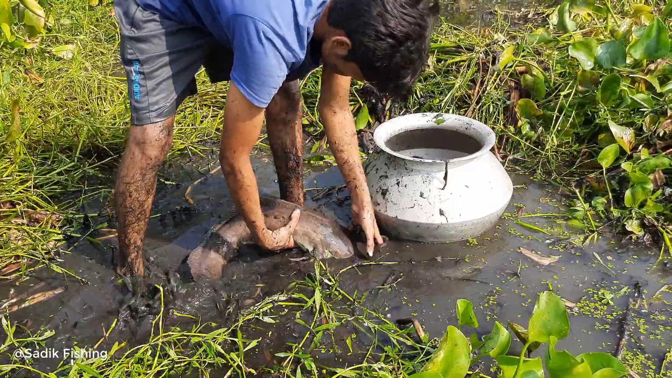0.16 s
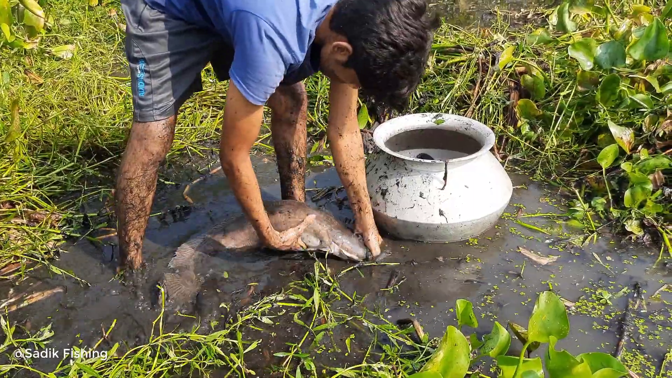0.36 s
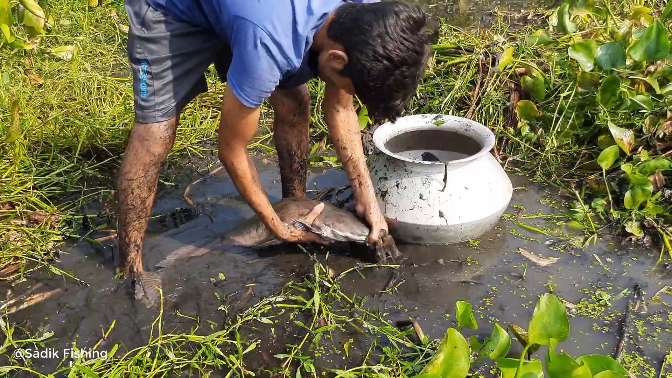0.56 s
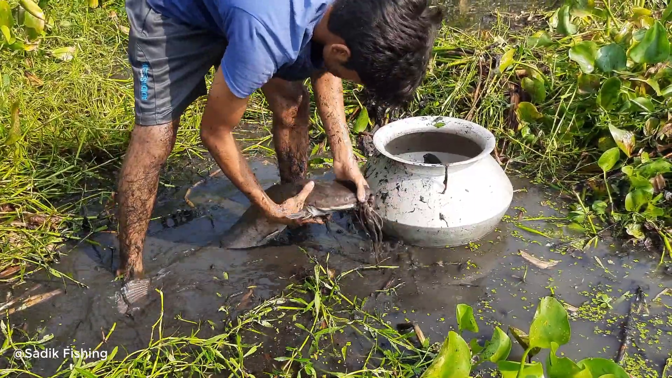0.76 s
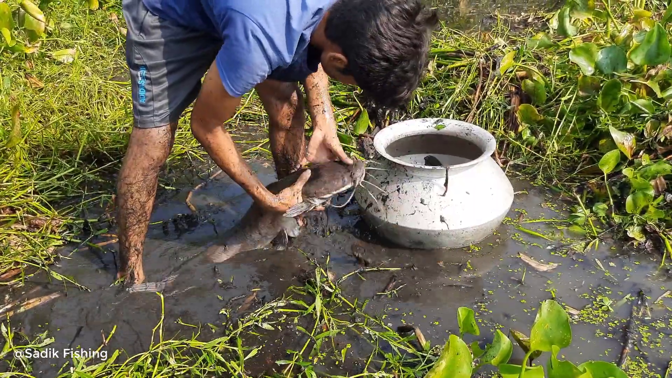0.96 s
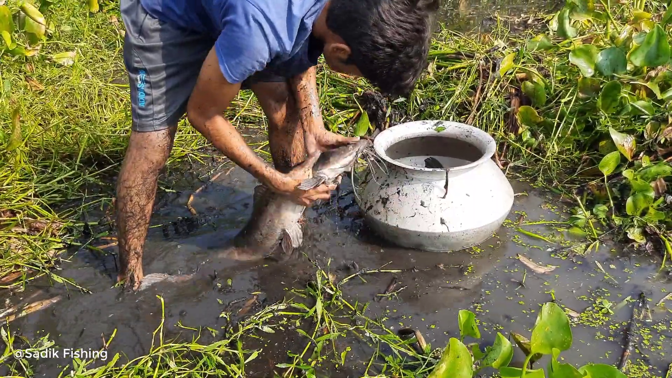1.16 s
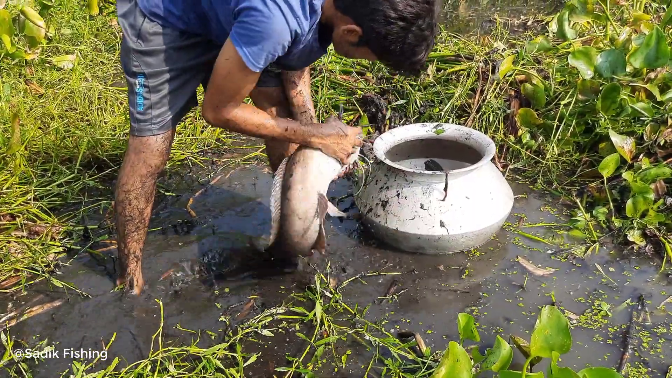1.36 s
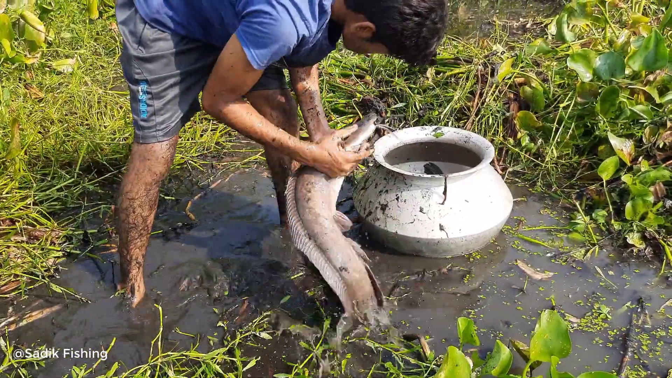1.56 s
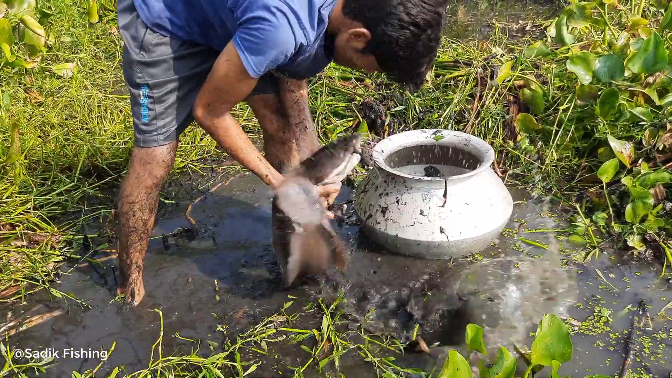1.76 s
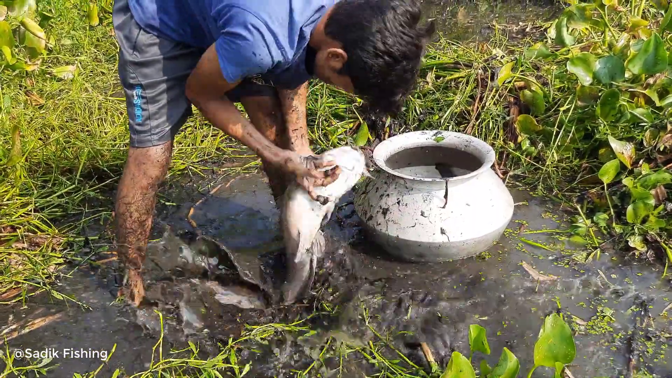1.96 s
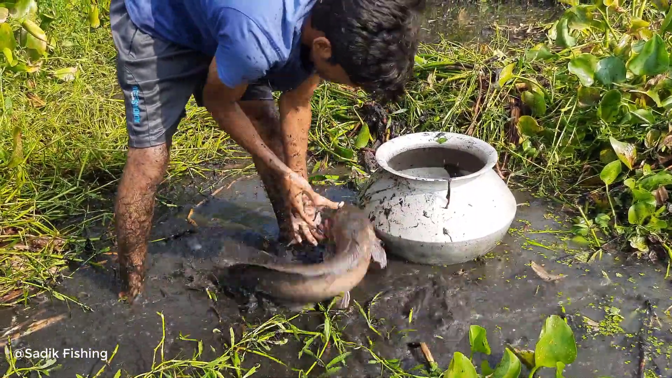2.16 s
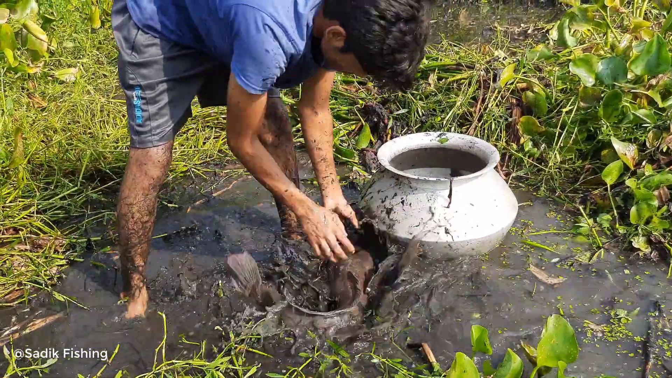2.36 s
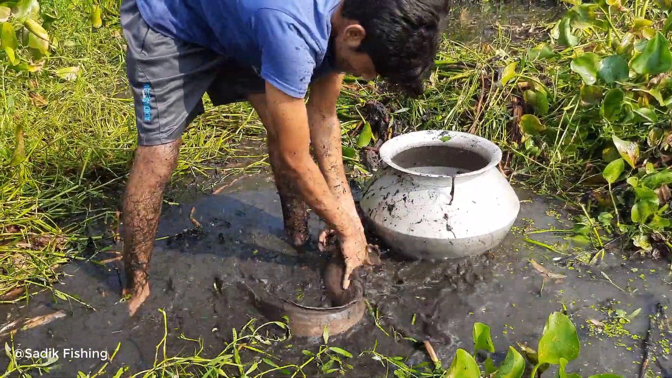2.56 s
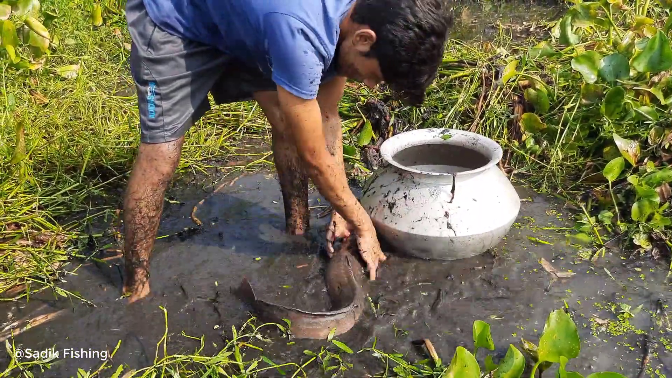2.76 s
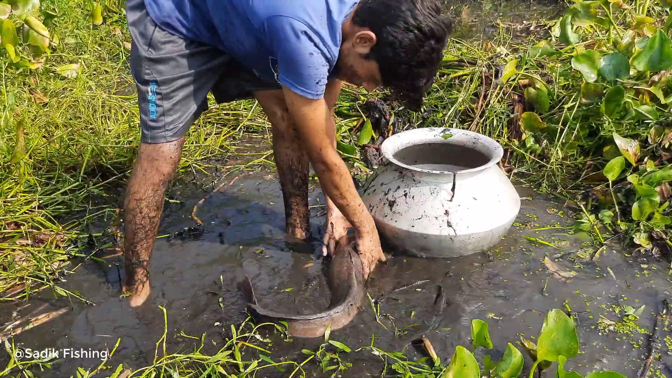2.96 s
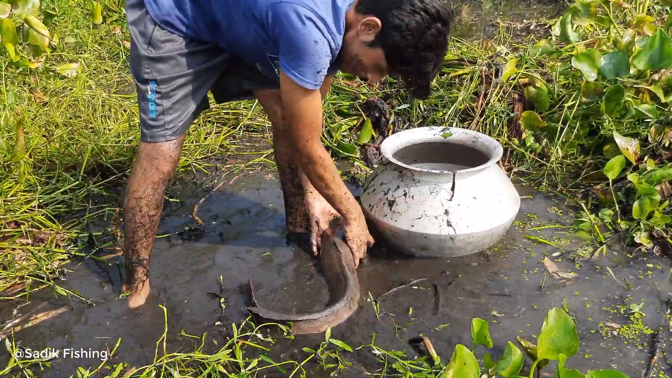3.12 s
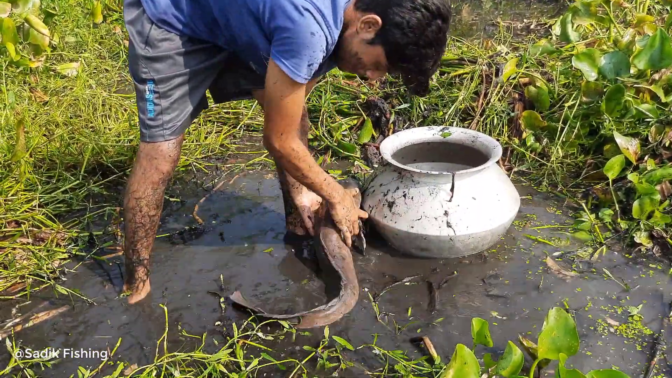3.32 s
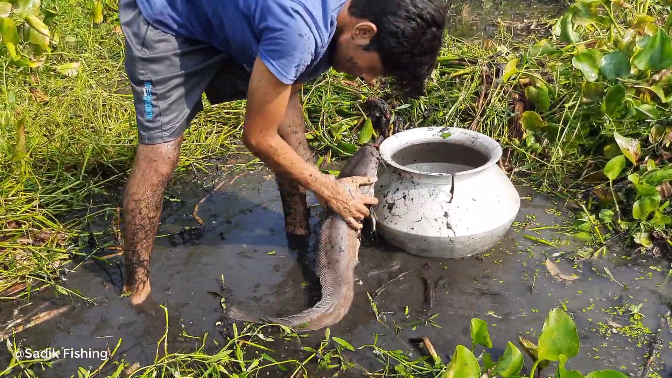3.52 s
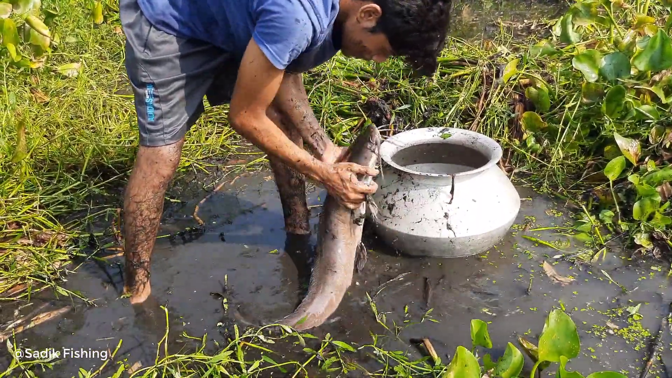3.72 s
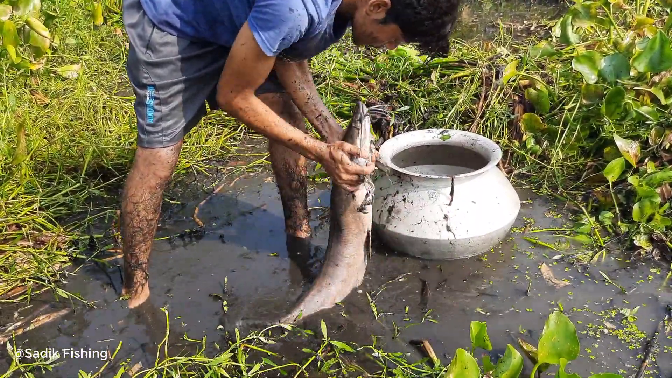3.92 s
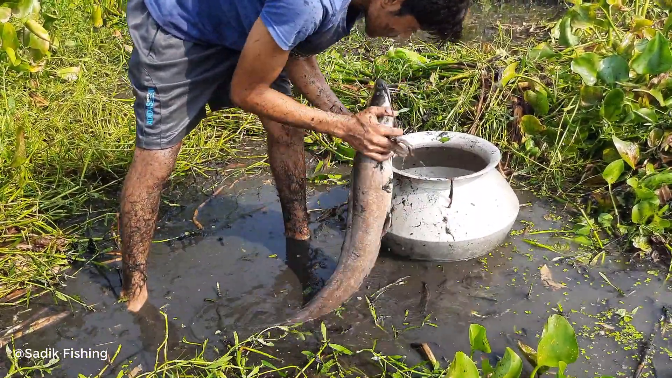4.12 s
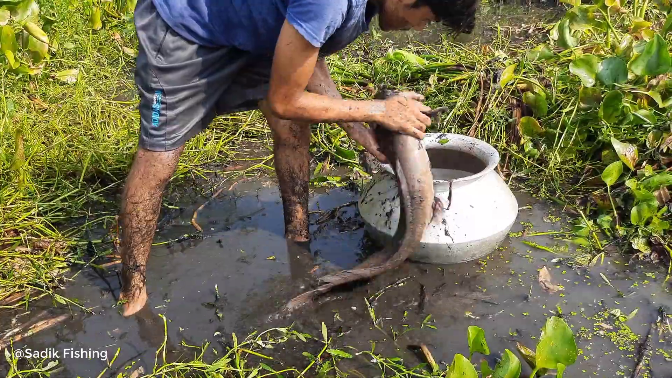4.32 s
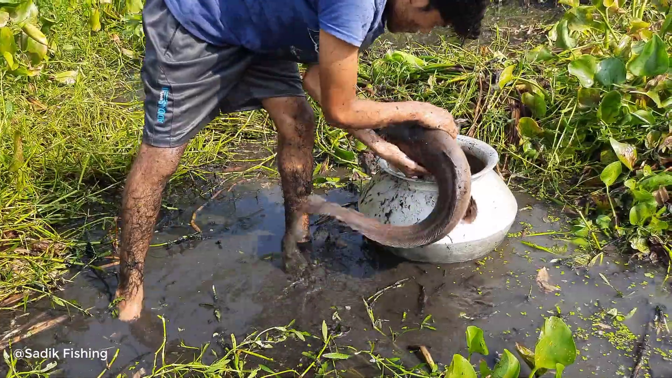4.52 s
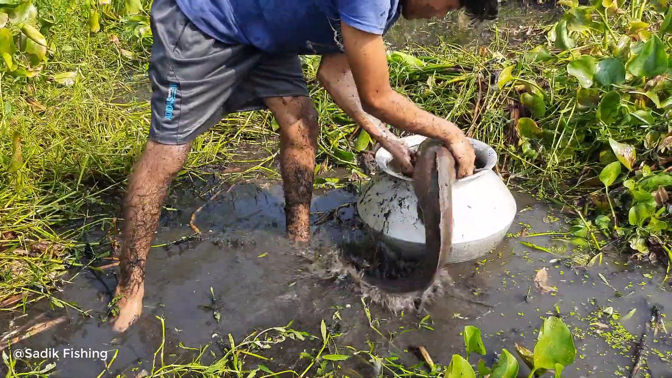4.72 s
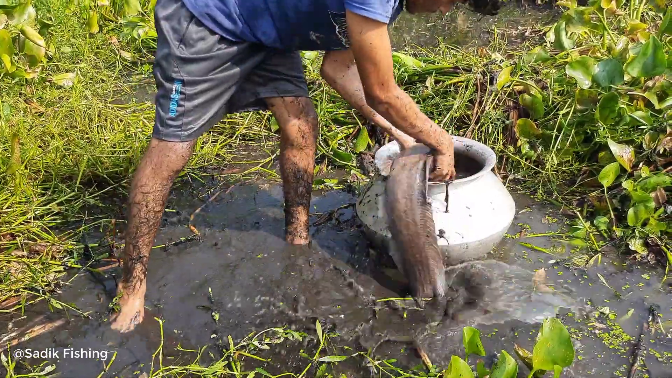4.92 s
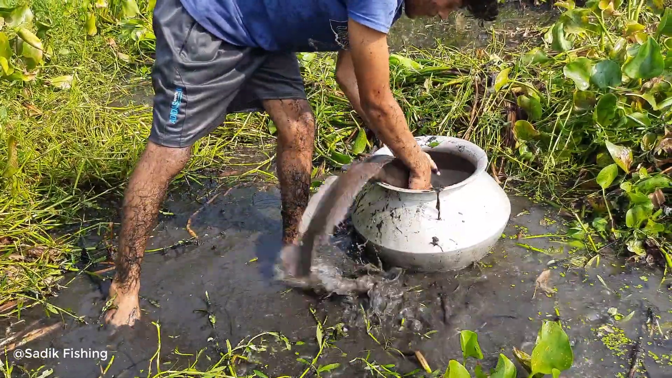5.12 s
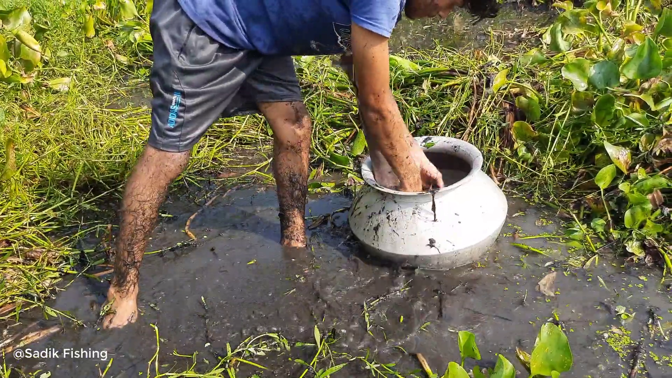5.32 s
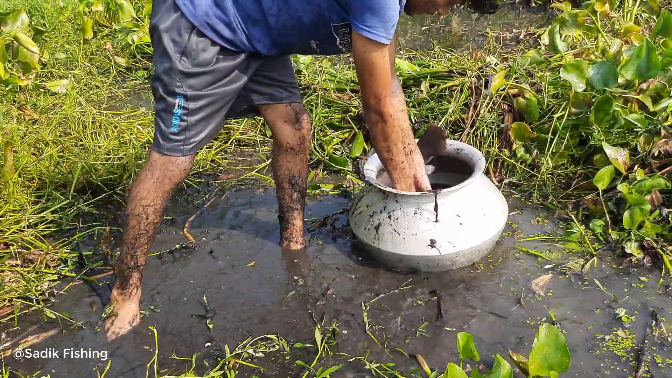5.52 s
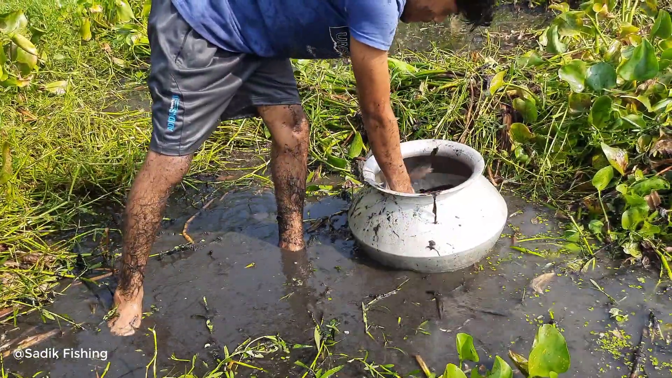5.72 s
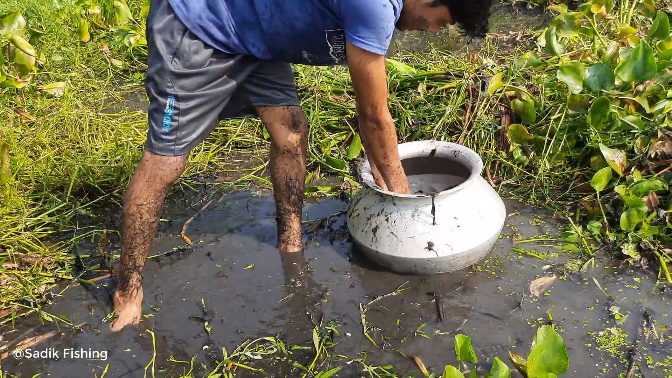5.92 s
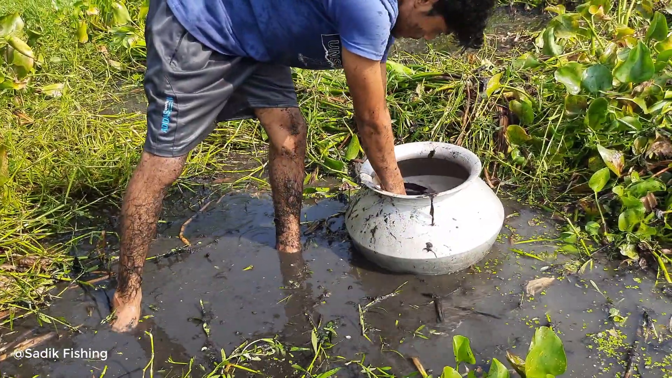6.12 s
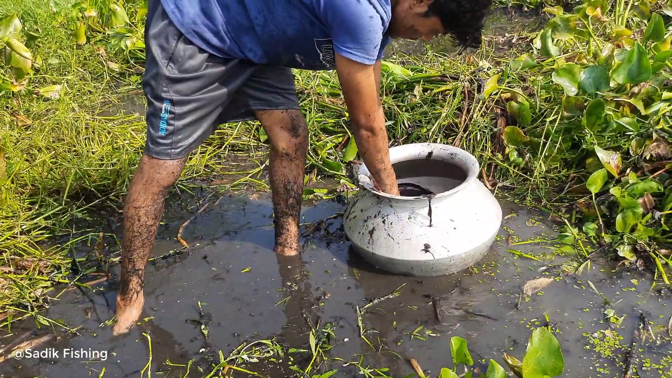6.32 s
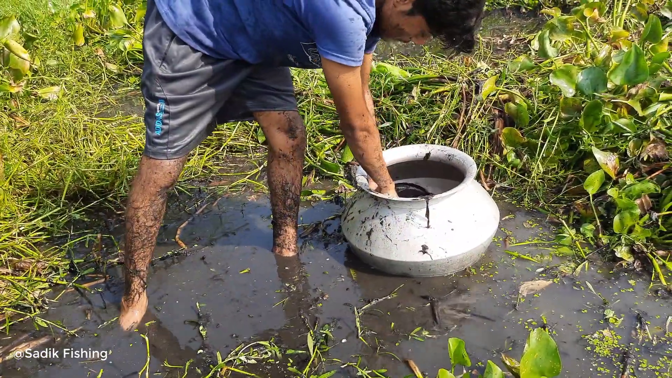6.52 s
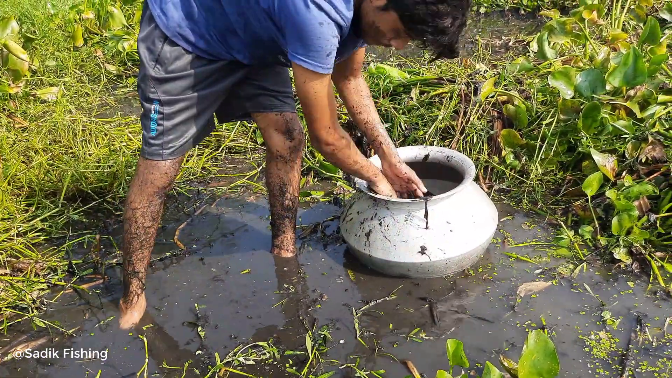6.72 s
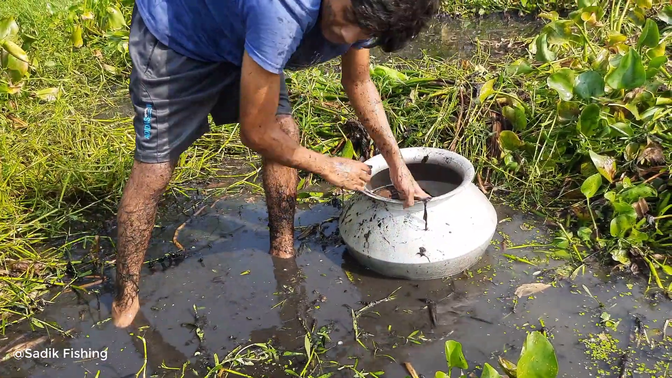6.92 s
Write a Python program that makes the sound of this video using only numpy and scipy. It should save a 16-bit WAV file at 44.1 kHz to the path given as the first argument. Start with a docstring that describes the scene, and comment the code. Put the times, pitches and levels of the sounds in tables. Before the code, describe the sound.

Outdoors and close up, violent muddy splashes and squelches come in bursts, separated by near-silence with faint birds, ending in soft water dribbles.

```python
"""Wet slaps and spray open the scene: a big fish thrashes in shallow mud, is lifted by hand and lowered
into a metal water pot. Slaps, drops, spray and squelching mud are shaped noise, with a few hollow resonances.
Gulping air pockets and plinking bubbles are gliding, decaying tones; wet skin swishes and slurps.
Around it lie a low filtered-noise rumble, thin hiss, and far hoots and birds as unsteady gliding tones.
Two closely spaced microphones hear it all."""
import sys
import numpy as np
from scipy import signal
from scipy.fft import rfft, irfft
from scipy.io import wavfile
from scipy.ndimage import uniform_filter1d

SR = 44100
rng = np.random.default_rng(int(sys.argv[2]) if len(sys.argv) > 2 else 0)


def transcribe(signal):
    """Save signal, clipped to [-1, 1], as a 16-bit WAV file at the path in sys.argv[1]."""
    frames = np.atleast_2d(signal).T
    limited = np.clip(frames, -1, 1)
    pcm = np.round(limited * 32767).astype(np.int16)
    wavfile.write(sys.argv[1], SR, pcm)


N = 307818
TIME = np.arange(N) / SR

# low rumble of the open air: [f/Hz, level/dB]
RUMBLE_COLOUR = [(15, -33.5), (30, -19), (40, -19.5), (52, -1.5), (80, 0.5), (112, 5.5), (135, -2.5),
                 (165, -7.5), (230, -7.5), (310, -13.5), (430, -26), (700, -53.5)]
# thin hiss of the open air: [f/Hz, level/dB]
HISS_COLOUR = [(200, -23), (450, -3), (720, 4.5), (1000, -11.5), (1600, -16.5), (2400, -11.5), (3200, -12),
               (4500, -6), (6400, -9), (7700, -35), (9000, -17.5), (11000, -12.5), (13500, -37),
               (16000, -61)]
# narrow bands that stand out in the hiss: [f/Hz, width/Hz, level/dB]
SIZZLE_BANDS = [(6670, 520, -76.5), (8740, 520, -81.5)]
RUMBLE_DB, HISS_DB = -57.5, -69

# fish and hands moving through the water, t being where the swell is full:
# [t/s, length/s, spray level/dB, gurgle level/dB, deep churn level/dB]
STROKES = [(0, 0.0025, -32, -37.5, -50), (0.057, 0.13, -48, -53, -60), (0.208, 0.19, -58.5, -61, -66),
           (0.413, 0.15, -64, -68, -86), (0.76, 0.11, -68, -72, -66), (1.203, 0.13, -60, -50.5, -50.5),
           (1.383, 0.16, -60, -53.5, -59.5), (1.584, 0.0046, -33.5, -41, -57.5),
           (1.63, 0.043, -57, -41.5, -57), (1.738, 0.14, -43.5, -41, -46), (1.933, 0.004, -30.5, -24, -34),
           (2.014, 0.16, -39, -39.5, -44.5), (2.196, 0.07, -38.5, -36, -46.5),
           (2.322, 0.026, -32.5, -33, -47.5), (2.414, 0.19, -44.5, -48.5, -58),
           (2.636, 0.22, -57.5, -85, -82), (3.316, 0.18, -77, -64.5, -83), (3.542, 0.31, -77, -76.5, -91),
           (4.532, 0.0059, -56.5, -45, -44), (4.6, 0.32, -64, -72, -63), (4.833, 0.16, -44, -48.5, -50.5),
           (5.03, 0.043, -41, -36.5, -52), (5.124, 0.096, -49, -47, -49.5), (5.214, 0.036, -48.5, -49, -52),
           (5.341, 0.0068, -54, -42.5, -51), (5.482, 0.018, -47.5, -51.5, -47.5),
           (5.568, 0.0089, -40, -36.5, -41.5), (5.703, 0.012, -74, -56.5, -52),
           (5.82, 0.2, -64, -62.5, -79), (5.9, 0.37, -65.5, -65.5, -66), (6.408, 0.25, -78, -72, -71)]
# a stroke swells (a long one more slowly), holds and settles
SWELL_S, SWELL_SHARE, SETTLE_S = 0.033, 0.051, 0.028
RUNOFF_DB, RUNOFF_S = -29, 0.27  # water trickling back, against the stroke
# thrown droplets: [f/Hz, level/dB]
SPRAY_COLOUR = [(500, -38.5), (1400, -19.5), (2200, -6), (4000, -1), (5700, -5), (7500, -11),
                (10000, -10.5), (12500, -10), (16000, -17)]
# the finest droplets: [f/Hz, level/dB]
MIST_COLOUR = [(5000, -34.5), (7500, -12.5), (10000, -20), (12500, 9), (16000, 4.5)]
# bubbles inside the stirred mud: [f/Hz, level/dB]
GURGLE_COLOUR = [(200, -9.5), (400, -11.5), (550, -5.5), (720, 4.5), (900, -0.5), (1100, 2.5), (1350, 8),
                 (1550, 0.5), (1800, 3.5), (2300, 6), (3500, -20)]
# the mass of water pushed aside: [f/Hz, level/dB]
CHURN_COLOUR = [(40, -38.5), (110, 4.5), (230, -4), (320, -4), (450, -8), (900, -56)]

# slaps, splashes and single drops, the body level being against the crackle:
# [t/s, level/dB, rise/s, crackle fade/s, body f/Hz, body level/dB]
HITS = [(.026, -33.5, 0.011, 0.0071, 1470, -1.5), (0.082, -34.5, 0.0034, 0.006, 1330, 2),
        (0.177, -39, 0.00087, 0.011, 2510, -18), (0.2422, -46.5, .0006, 0.0033, 4670, 8.5),
        (0.3275, -48.5, .0006, 0.023, 2580, 5.5), (0.343, -37, 0.0094, 0.0056, 1500, -13),
        (.382, -40, 0.002, 0.008, 1010, -19), (0.475, -44, 0.00095, 0.0019, 4600, -3),
        (.562, -53, 0.0012, 0.0025, 5360, 5.5), (0.711, -52, 0.0012, 0.0076, 2630, -3),
        (0.785, -55, 0.0013, 0.0051, 4200, 6), (0.803, -54, 0.0011, .003, 4250, 6),
        (0.822, -50.5, 0.00084, 0.0024, 4100, 0), (1.099, -52.5, 0.00082, 0.013, 3000, -12),
        (1.2, -43, 0.0026, .009, 1880, -3), (1.4157, -46.5, 0.00079, 0.0057, 3030, 1),
        (1.45, -38, 0.0023, 0.0026, 3090, -1), (1.465, -30.5, 0.002, 0.003, 3660, 4),
        (1.4731, -36, 0.0034, 0.0024, 5740, 3), (1.509, -44.5, 0.0013, 0.0044, 4690, 6.5),
        (1.563, -14.5, 0.00074, 0.0046, 1580, -2.5), (1.6478, -30, 0.0004, 0.0028, 5000, 0),
        (1.784, -38.5, 0.00071, 0.0067, 1400, 8.5), (1.825, -36, 0.0051, 0.0065, 2100, 3.5),
        (1.8897, -15.5, 0.00068, 0.0063, 1540, -11), (1.92, -20, 0.0013, 0.0071, 1400, -10),
        (1.931, -23, 0.0014, 0.022, 2130, -2.5), (1.949, -15.5, 0.0028, 0.0053, 900, -3.5),
        (1.956, -23, 0.00078, 0.0035, 1344, 2.5), (2.125, -41.5, 0.015, 0.015, 1282, 8.5),
        (2.146, -39.5, 0.0028, 0.0068, 260, 7.5), (2.228, -38.5, 0.0016, .007, 2200, 3),
        (2.26, -38, .002, 0.0055, 4600, 3), (2.3, -19, 0.002, 0.011, 1010, -6),
        (2.462, -30, 0.0027, 0.013, 1320, -10.5), (2.562, -42, .002, 0.005, 4700, -1),
        (2.678, -46.5, 0.00083, 0.0039, 5740, 1), (2.907, -46.5, 0.00058, 0.015, 4320, -0.5),
        (2.931, -58, 0.0017, 0.0063, 1150, 6), (2.987, -55.5, 0.0031, 0.0093, 2280, 8),
        (3.005, -55.5, 0.0017, 0.0092, 1250, -1), (3.42, -70, .002, 0.0058, 2200, 12),
        (3.452, -71, 0.0015, 0.0062, 640, 18), (3.584, -67.5, 0.0037, 0.02, 1330, -2),
        (3.913, -57, 0.0012, 0.0036, 1350, -6), (4.475, -62, 0.00074, .004, 4300, 9.5),
        (4.519, -50.5, 0.0044, 0.02, 1500, 10.5), (4.664, -62.5, .001, .004, 3300, 11.5),
        (4.726, -61.5, 0.0009, .004, 5700, 11.5), (4.781, -57, 0.006, .008, 5200, 3),
        (4.737, -54.5, 0.0026, 0.0047, 3300, 9.5), (4.815, -20.5, 0.00033, 0.013, 593, -10),
        (4.817, -17, 0.00033, 0.0084, 1224, -4), (4.954, -38, 0.0018, 0.0096, 1350, 1),
        (5.015, -40, 0.0024, 0.026, 518, 7.5), (5.046, -32.5, 0.0017, 0.005, 5200, -2),
        (5.054, -36, 0.0025, 0.011, 3020, 4.5), (5.072, -36.5, .001, 0.0045, 9500, -4.5),
        (5.172, -41, 0.0017, 0.0061, 3400, 0), (5.114, -36, 0.0017, 0.01, 2630, -2.5),
        (5.228, -40, 0.0013, 0.02, 5560, 0), (5.305, -45.5, 0.0029, 0.029, 2600, 0),
        (5.338, -33.5, 0.0061, 0.031, 1090, -36), (5.361, -30.5, 0.001, 0.0027, 1900, -7.5),
        (5.392, -38.5, 0.001, 0.0078, 915, -10.5), (5.481, -58.5, .003, 0.019, 1650, 15.5),
        (5.545, -37, 0.0014, 0.01, 3600, 4), (5.565, -34, 0.0027, 0.0032, 520, 1.5),
        (5.634, -49.5, 0.0022, 0.014, 3520, 9), (5.773, -48.5, 0.0016, 0.019, 4220, 1),
        (5.81, -41, 0.0063, 0.015, 2130, -11), (5.902, -43.5, 0.0035, 0.021, 1310, -10.5),
        (6.075, -42, 0.0018, 0.011, 1670, -5.5), (6.166, -60, .001, 0.0042, 5600, 3),
        (6.181, -67, 0.0025, 0.0078, 4750, 15.5), (6.426, -64, .004, 0.017, 1500, 1.5),
        (6.53, -70, .001, .005, 4050, 14.5)]
# bursting water film: [f/Hz, level/dB]
CRACKLE_COLOUR = [(60, -64.5), (160, 0), (400, -7.5), (900, -9.5), (2000, -3), (4000, 1), (5700, -1),
                  (7500, -7.5), (10000, -7), (12500, -3.5), (16000, -8.5)]
FALLBACK_DB, FALLBACK_S = -36.5, 0.034  # thrown water landing: a weak, slower tail on each hit
# a few resonances that add a hollow ring to the splashes: [f/Hz, sharpness Q, level/dB]
HOLLOW_RINGS = [(114, 8.7, -7), (239, 3.8, -7), (953, 25, -4), (1335, 14, -7.5), (1670, 55, 0.5)]

# single bubbles that plink: [t/s, peak level/dB, starting f/Hz]
BUBBLES = [(0.048, -36, 1320), (.081, -33, 2230), (0.115, -38, 1360), (.128, -44, 600), (.15, -50, 985),
           (0.243, -37.5, 2690), (0.354, -47.5, 940), (.402, -48.5, 1320), (.467, -44.5, 1384),
           (0.557, -39, 1310), (.492, -67, 2880), (0.729, -35.5, 3840), (.757, -55, 2350), (.78, -59, 1320),
           (0.816, -49, 1610), (0.825, -58, 1110), (1.434, -45.5, 522), (1.451, -42, 1350),
           (1.527, -39, 1450), (1.66, -35, 1310), (1.777, -40.5, 398), (1.813, -29.5, 534),
           (1.818, -33.5, 1260), (1.89, -30, 1290), (1.89, -30, 620), (2.134, -33, 693),
           (2.204, -29.5, 1640), (2.261, -33.5, 1260), (2.229, -27, 674), (2.512, -32.5, 1260),
           (2.517, -37.5, 570), (2.54, -38, 3170), (2.616, -39.5, 3980), (3.302, -50, 666),
           (3.325, -52.5, 1290), (3.324, -49.5, 548), (3.347, -44.5, 607), (3.349, -56, 1230),
           (3.344, -49.5, 4380), (3.366, -56, 5460), (3.424, -49, 595), (3.463, -54, 1160),
           (3.679, -53, 4270), (3.709, -47.5, 4500), (3.831, -53.5, 1790), (3.85, -61, 1610),
           (4.698, -46.5, 2170), (4.705, -53.5, 1900), (4.8145, -18, 536), (4.938, -38, 1620),
           (4.953, -35, 500), (4.957, -32, 1260), (4.98, -38, 1340), (5.147, -18, 1324), (5.168, -35, 1580),
           (5.183, -37.5, 650), (5.194, -30.5, 1260), (5.198, -34, 644), (5.222, -44, 670),
           (5.232, -52, 1200), (5.31, -42.5, 1145), (5.48, -48, 1640), (5.512, -44, 2150),
           (5.566, -37, 1334), (5.7, -56.5, 574), (5.714, -63, 1090), (5.833, -58, 1040),
           (5.924, -52, 1180), (5.976, -52, 1000)]
# air cavities squeezed shut under the fish: [t/s, peak level/dB, starting f/Hz, length/s, end f as a factor]
CAVITIES = [(1.202, -45, 229, 0.02, 1.2), (1.225, -41.5, 215, .026, 1.2), (1.258, -53, 290, 0.033, 1.04),
            (1.46, -45, 244, 0.084, 1.83), (1.499, -43, 432, 0.058, 3.5), (1.754, -27.5, 224, 0.024, 2.9),
            (1.777, -33.5, 408, 0.018, 1.9), (1.778, -35.5, 217.5, 0.067, 3.6),
            (1.845, -40.5, 445, 0.057, 2.7), (1.887, -33, 425, 0.008, 1.1),
            (1.899, -26.5, 216, 0.066, 1.22), (1.888, -36, 130.7, 0.14, 1.23),
            (1.949, -20, 650, 0.015, 1.4), (1.956, -31.5, 231.4, 0.15, 1.08),
            (1.959, -32.5, 155.7, 0.13, 1.2), (2.148, -25, 140, 0.016, 1.3), (2.148, -31, 118, 0.086, 0.92),
            (2.302, -27.5, 490, 0.011, 0.89), (2.318, -23.5, 380, 0.0067, 0.86),
            (2.323, -39, 207.3, 0.038, 1.3), (2.553, -40.5, 191, 0.045, 1.27),
            (5.011, -31.5, 279, 0.037, 0.85), (5.017, -35.5, 498.3, 0.081, 1.1),
            (5.045, -29.5, 452, 0.026, 0.44), (5.566, -34, 138, 0.082, 0.68)]
RING_S, RING_SLOPE = 0.017, 0.59  # length of a 1 kHz bubble; bigger ones ring longer
BUBBLE_RISE = 1.2  # pitch factor as a bubble nears the surface

# faint far hoots: [t/s, level before the swell/dB, length/s, f/Hz, end f as a factor, arch as a share of f]
HOOTS = [(0.502, -69, 0.27, 668, 0.87, 0.016), (.63, -73, 0.23, 838, 0.87, -0.004),
         (0.901, -68.5, 0.174, 725, 1.06, 0.022), (2.602, -68.5, 0.47, 782, 0.9, 0.034),
         (3.054, -76, 0.28, 690, 0.9, -0.0047), (3.381, -71, 0.66, 801, 0.89, 0.011),
         (4.0, -72, 0.36, 775, 0.93, -0.0059), (4.153, -73.5, 0.32, 804, 0.91, 0.014),
         (4.445, -66, .34, 773, 0.89, 0.00069), (6.024, -72.5, 0.61, 797, 0.85, .01)]
# wet skin sliding and water running off it:
# [t/s, level before the swell/dB, length/s, f/Hz, width as a share of f]
SWISHES = [(1.183, -49.5, 0.087, 3320, 0.4), (1.24, -50, 0.073, 2100, 0.9), (1.189, -58, 0.17, 420, 1),
           (1.2, -57.5, 0.13, 12720, 0.17), (1.332, -51.5, 0.11, 2890, 0.31), (1.961, -50.5, 0.42, 1650, 1),
           (2.294, -42, 0.14, 2000, 1), (2.622, -69, 0.41, 2156, 1), (2.958, -74, 0.21, 2600, 0.13),
           (4.239, -80, 0.081, 1500, 0.97), (4.475, -60, 0.07, 2590, 1), (4.513, -45.5, 0.057, 1675, 0.75),
           (4.515, -46, 0.078, 3300, 0.63), (4.562, -60.5, 0.092, 1060, 1),
           (4.888, -42.5, 0.093, 3500, 0.93), (4.92, -40.5, 0.057, 2280, 1), (5.154, -43, 0.054, 3130, 0.9),
           (5.685, -59, .06, 1400, 1), (6.187, -69.5, 0.37, 770, 1), (6.527, -72.5, 0.37, 1690, 1),
           (6.778, -66.5, 0.23, 2340, 1)]
# frothy gaps narrowing between skin and mud:
# [t/s, level before the swell/dB, length/s, starting f/Hz, end f/Hz]
SLURPS = [(1.725, -42, 0.037, 820, 1380), (2.177, -43.5, 0.024, 640, 1260),
          (2.196, -37.5, 0.038, 1085, 1805), (2.216, -41.5, 0.033, 698, 1350),
          (2.503, -40, 0.02, 844, 1490), (3.428, -63, 0.055, 542, 1300), (5.015, -39.5, 0.051, 922, 1442),
          (5.11, -41.5, 0.022, 623, 1210), (5.128, -33.5, 0.017, 1144, 1710),
          (5.318, -45.5, 0.037, 662, 1160)]
# slurred notes of far birds:
# [t/s, level before the swell/dB, length/s, starting f/Hz, end f/Hz, hoarseness/Hz]
BIRDS = [(2.862, -69, .11, 2800, 2450, 150), (3.03, -72, 0.14, 2660, 2310, 160),
         (3.019, -79, 0.12, 3220, 2860, 158), (3.163, -78, 0.16, 2920, 2650, 149),
         (3.135, -73, 0.095, 2450, 2270, 128), (3.248, -73, 0.14, 2210, 2680, 71),
         (3.366, -73, 0.1, 2220, 2400, 50), (3.539, -69, 0.065, 2140, 2530, 45.3),
         (3.643, -72.5, 0.15, 2360, 2217, 51.3), (3.774, -71, 0.075, 2090, 2620, 61),
         (3.947, -67, 0.025, 4200, 3770, 180), (4.045, -75.5, 0.071, 2070, 2610, 60.6),
         (4.206, -68, 0.038, 3500, 3900, 180), (4.29, -72.5, 0.071, 2220, 2644, 60),
         (4.31, -72, 0.079, 5000, 4450, 120), (6.82, -68, 0.31, 4170, 5850, 279)]

# tone balance of the two microphone ports: [f/Hz, left minus right level/dB]
PORT_BALANCE = [(100, 0.5), (700, 0), (1050, -3), (1250, 4.5), (1450, -12.5), (1800, 3), (2400, -0.5),
                (4000, -6), (5500, -9.5), (7300, -1.5), (8300, 23.5), (9300, 14), (10600, 13.5),
                (12500, 1.5), (15500, 5.5)]
# how alike the noise is at both ports: [f/Hz, likeness from 0 to 1]
PORT_LIKENESS = [(40, 0.76), (110, 0.94), (300, 0.77), (650, 0.7), (1300, 0.4), (2200, 0.057),
                 (4000, 0.081), (7000, 0.037), (15000, .05)]
# how far the left port leads: [f/Hz, phase/radians]
PORT_LEAD = [(110, .12), (300, 0.21), (600, 0.35), (1200, 1.37), (2400, 0.24)]
EDGE_HZ = 15900  # top of the microphones' band


def amp(db):
    """Decibels to gain."""
    return 10 ** (np.asarray(db) / 20)


def unit(x):
    """Scales to rms 1."""
    return x / np.sqrt(np.mean(x ** 2) + 1e-20)


def read(points, hz):
    """Reads a table along log frequency."""
    f, value = np.transpose(points)
    return np.interp(np.log(hz + 1), np.log(f + 1), value)


def bins(x):
    """The frequencies of a sound's spectrum."""
    return np.fft.rfftfreq(x.shape[-1], 1 / SR)


def colour(x, points):
    """Shapes a sound's spectrum with a curve of f/Hz, level/dB."""
    return irfft(rfft(x) * amp(read(points, bins(x))), x.shape[-1])


def add(mix, s, sound):
    """Mixes a stereo sound in at time s."""
    part = mix[:, max(0, round(s * SR)):][:, :sound.shape[1]]
    part += sound[:, :part.shape[1]]


def noise(size):
    """White noise at both ports: more alike in the bass, nearly unrelated in the treble."""
    white = rng.standard_normal((2, size))
    (left, other), hz = rfft(white), bins(white)
    same = np.clip(read(PORT_LIKENESS, hz), 0, 1)
    right = same * left + np.sqrt(1 - same ** 2) * other
    right = right * np.exp(-1j * read(PORT_LEAD, hz))
    return irfft(np.array([left, right]), size)


def band(x, hz, width_hz):
    """A resonance with steep skirts, its width taken 6 dB below the peak."""
    f = bins(x) + 1
    return irfft(rfft(x) / (1 + ((f - hz ** 2 / f) / width_hz) ** 2), x.shape[-1])


def low_drift(shape, limit_hz):
    """Slow random motion below a limit; rms 1."""
    lowpass = signal.butter(2, limit_hz, fs=SR, output="sos")
    return unit(signal.sosfilt(lowpass, rng.standard_normal(shape)))


def patter(size, per_s, spread_db, fade_s):
    """Envelope of droplets of uneven size, each a sudden tick that dies away; rms 1."""
    falls = rng.random(size) < per_s / SR
    sizes_db = spread_db * np.minimum(rng.exponential(1, size), 3.5)
    hits = falls * amp(sizes_db) ** 2
    power = signal.lfilter([1], [1, -np.exp(-2 / (fade_s * SR))], hits)
    return unit(np.sqrt(power + 1e-6))


def mottle(x, patchy_db):
    """Patches of the spectrum swell and sink for hundredths of a second, as tearing water sheets do; rms 1."""
    z = signal.stft(x, nperseg=512, noverlap=384)[2]
    patches = rng.standard_normal(z.shape[1:])
    patches = uniform_filter1d(patches, size=9, axis=0)
    patches = unit(uniform_filter1d(patches, size=6, axis=1))
    return unit(signal.istft(z * amp(patchy_db * patches), nperseg=512, noverlap=384)[1][:, :N])


def blurred(hz, blur_hz, steady):
    """A tone on a pitch curve, its strength and phase wandering as paths or froth would blur it; rms 1."""
    phase = 2 * np.pi * np.cumsum(hz) / SR
    a, b = low_drift((2, len(hz)), blur_hz)
    return unit((steady + a) * np.cos(phase) + b * np.sin(phase))


def bubble(hz, length, glide, lead, swell=0.23):
    """An air pocket swells, rings down and glides in pitch; peak about 1."""
    u = np.arange(int(1.9 * length * SR) + 2) / (length * SR)
    shape = (u / swell) ** 2 * np.exp(2 * (1 - u / swell))
    phase = 2 * np.pi * np.cumsum(hz * glide ** np.minimum(u, 1)) / SR
    return shape * np.sin(phase - np.array([[0], [lead]]))


def swarm(count, low_hz, high_hz, cycles, spread_db, glide):
    """A steady crowd of small bubbles of random size and place; rms 1."""
    out = np.zeros((2, N))
    when, pitch, size, ring, rise, place = rng.random((count, 6)).T
    pitches = low_hz * (high_hz / low_hz) ** pitch
    scatter = 2 * np.pi * (place - .5) * (1 - read(PORT_LIKENESS, pitches))
    leads = read(PORT_LEAD, pitches) + scatter
    gains = amp(-spread_db * np.log(np.maximum(size, .04)))
    lengths = cycles * (.5 + ring) / pitches
    climbs = 1 + glide * rise
    for s, hz, gain, lead, length, climb in zip(when * N / SR, pitches, gains, leads, lengths, climbs):
        add(out, s, gain * bubble(hz, length, climb, lead))
    return unit(out)


def bank(x, t60=0.51, wet_db=-16):
    """The leafy bank scatters a short tail of decaying noise."""
    t = np.arange(SR // 2) / SR
    tail = noise(len(t)) * amp(-60 * t / t60) * (t > .003)
    return amp(wet_db) * signal.fftconvolve(x, tail / np.linalg.norm(tail[0]), axes=1)[:, :N]


def open_air():
    """Low rumble and thin restless hiss of filtered noise, with far off hoots and birds."""
    rumble = amp(RUMBLE_DB) * unit(colour(noise(N), RUMBLE_COLOUR))
    hiss = amp(HISS_DB) * mottle(colour(noise(N), HISS_COLOUR), patchy_db=1.0)
    sizzle = sum(amp(db) * unit(band(noise(N), hz, width)) for hz, width, db in SIZZLE_BANDS)
    return rumble + hiss + sizzle + hoots() + birds()


def stirred(column):
    """How hard the water moves, as a gain: swell, hold, settling and run-off for one level column of STROKES."""
    t = TIME[::32]
    power = np.zeros(len(t))
    for row in STROKES:
        s, length = row[:2]
        swell = np.clip(1 + (t - s) / (SWELL_S + SWELL_SHARE * length), 0, 1) ** 0.89
        after = np.maximum(t - s - length, 0)
        settling = np.exp(-after / SETTLE_S) + amp(RUNOFF_DB) * np.exp(-after / RUNOFF_S)
        power += (amp(row[column]) * swell * settling) ** 2
    return np.interp(TIME, t, np.sqrt(power))


def spray(ticks_db=-1, plinks_db=-9, mist_db=-10, full_db=-40, plink_growth=0.06, mist_growth=0.28):
    """Thrown droplets tick on the mud; a harder throw adds ringing specks and fine mist."""
    level = stirred(column=2)
    force = np.minimum(level / amp(full_db), 1)
    ticks = mottle(colour(noise(N) * patter(N, 900, 2.3, 0.012), SPRAY_COLOUR), patchy_db=4.5)
    plinks = swarm(count=7000, low_hz=2340, high_hz=6550, cycles=14, spread_db=-6.0, glide=0.055)
    mist = mottle(colour(noise(N) * patter(N, 1200, 1.5, 0.00093), MIST_COLOUR), patchy_db=3.5)
    specks = amp(plinks_db) * plinks * force ** plink_growth
    haze = amp(mist_db) * mist * force ** mist_growth
    return level * (amp(ticks_db) * ticks + specks + haze)


def gurgle(squelch_db=-6.0, bubbles_db=-7):
    """Stirred mud squelches and folds in a dense, merging crowd of quickly rising bubbles."""
    squelch = mottle(colour(noise(N) * patter(N, 680, 0.73, 0.012), GURGLE_COLOUR), patchy_db=5)
    crowd = swarm(count=6400, low_hz=398.8, high_hz=2704, cycles=13, spread_db=-3.0, glide=0.19)
    bubbles = unit(colour(crowd, GURGLE_COLOUR))
    return stirred(column=3) * (amp(squelch_db) * squelch + amp(bubbles_db) * bubbles)


def churn(level_db=-3.0, waver_hz=45, waver_share=0.13, wobble_db=-8, wobble_hz=235):
    """The mass of water pushed aside, and a big air cavity that wobbles in it while the fish thrashes."""
    level = stirred(column=4)
    cavity_hz = wobble_hz * np.exp(waver_share * low_drift(N, waver_hz))
    cavity = unit(np.sin(2 * np.pi * np.cumsum(cavity_hz) / SR))
    mass = unit(colour(noise(N), CHURN_COLOUR))
    # the cavity comes forward in the hardest strokes
    return level * (amp(level_db) * mass + amp(wobble_db) * cavity * np.sqrt(level / level.max()))


def drips(level_db=-56, growth=0.32, seep_db=-54, plops_db=-53, seep_growth=0.79):
    """Stray drops tick on the mud and water seeps back in tiny plops, louder while it is being stirred."""
    level = stirred(column=2)
    force = level / level.max()
    ticks = unit(colour(noise(N) * patter(N, 40, 2.0, 0.0052), SPRAY_COLOUR))
    seep = unit(band(noise(N) * patter(N, 150, 2.8, 0.0065), 1700, 1500))
    plops = swarm(count=600, low_hz=1280, high_hz=5230, cycles=15, spread_db=-7.5, glide=0.12)
    trickle = amp(seep_db) * seep + amp(plops_db) * plops
    return amp(level_db) * ticks * force ** growth + trickle * force ** seep_growth


def slaps_and_drops(body_width=0.24, body_hold=0.8):
    """Slaps, splashes and single drops: each hit or drop is a crackle of noise over a resonant body."""
    out, size = np.zeros((2, N)), 2 ** 13
    t = np.arange(size) / SR
    for s, db, rise, fade, hz, body_db in HITS:
        attack, after = np.minimum(t / rise, 1), np.maximum(t - rise, 0)
        dying = np.exp(-after / fade) + amp(FALLBACK_DB) * np.exp(-after / FALLBACK_S)
        film = noise(size) * patter(size, 3200, 0.85, 0.00039)
        crackle = unit(colour(film, CRACKLE_COLOUR)) * dying
        body = unit(band(noise(size), hz, body_width * hz)) * np.exp(-after / (fade * body_hold))
        add(out, s, amp(db) * attack * (crackle + amp(body_db) * body))
    return out


def hollow_ring(x):
    """A few resonant filters, driven by the splashing, add a hollow ring to it."""
    return sum(amp(db) * signal.lfilter(*signal.iirpeak(hz, q, SR), x) for hz, q, db in HOLLOW_RINGS)


def pocket(hz, length, glide, froth_db=-14, tick_db=-19, tick_fade=0.0016):
    """One air pocket: the film breaks with a tick as the cavity rings, roughened by froth."""
    ring = bubble(hz, length, glide, read(PORT_LEAD, hz))
    froth = unit(uniform_filter1d(rng.standard_normal(SR // 2), size=50))
    out = ring * (1 + amp(froth_db) * froth[:ring.shape[1]])
    t = np.arange(1024) / SR
    tick = unit(colour(noise(len(t)), CRACKLE_COLOUR)) * np.exp(-t / tick_fade)
    # tick_db holds at 1500 Hz: small bubbles burst with a louder tick than large ones
    add(out, length / 10, amp(tick_db) * hz / 1500 * tick)
    return out


def gulps():
    """Big cavities sweep in pitch as they close; free bubbles ring for a time set by their size."""
    out = np.zeros((2, N))
    for s, db, hz, length, glide in CAVITIES:
        add(out, s, amp(db) * pocket(hz, length, glide))
    for s, db, hz in BUBBLES:
        length = RING_S * (10 ** 3 / hz) ** RING_SLOPE
        add(out, s, amp(db) * pocket(hz, length, BUBBLE_RISE))
    return out


def hoots():
    """Far tones that swell, arch a little in pitch and fade."""
    out = np.zeros((2, N))
    for s, db, length, hz, glide, arch in HOOTS:
        u = np.minimum(np.arange(SR) / (length * SR), 1)
        bow = 4 * u * (1 - u)
        note = blurred(hz * glide ** u * (1 + arch * bow), blur_hz=56, steady=3.2) * bow
        add(out, s, amp(db) * np.array([note, note]))
    return out


def swishes(swell_power=0.99):
    """Wet skin sliding: soft swells of grainy, band-limited noise."""
    out, size = np.zeros((2, N)), SR // 2
    for s, db, length, hz, width in SWISHES:
        grain = unit(band(noise(size) * patter(size, 1500, 1.3, 0.0011), hz, width * hz))
        u = np.minimum(np.arange(size) / (length * SR), 1)
        swell = abs(np.sin(np.pi * u)) ** swell_power
        add(out, s, amp(db) * grain * swell)
    return out


def slurps(froth_hz=110, steady=0.9):
    """Air sucked through a closing gap: a frothy resonance that climbs as it swells and fades."""
    out = np.zeros((2, N))
    for s, db, length, first_hz, last_hz in SLURPS:
        u = np.minimum(np.arange(SR // 8) / (length * SR), 1)
        note = blurred(first_hz * (last_hz / first_hz) ** u, blur_hz=froth_hz, steady=steady)
        add(out, s, amp(db) * np.array([note, note]) * np.sin(np.pi * u))
    return out


def birds(steady=0.45):
    """Short whistles, some clear and some hoarse, whose glide eases off toward the end."""
    out = np.zeros((2, N))
    for s, db, length, first_hz, last_hz, hoarse_hz in BIRDS:
        u = np.minimum(np.arange(SR // 3) / (length * SR), 1)
        pitch = first_hz + (last_hz - first_hz) * np.sin(np.pi * u / 2)
        note = blurred(pitch, blur_hz=hoarse_hz, steady=steady)
        add(out, s, amp(db) * np.array([note, note]) * np.sin(np.pi * u))
    return out + bank(out, t60=0.45, wet_db=-3.5)


def scene(ring_db=-2):
    """All the water sounds, their ring and scatter, and the open air."""
    splashing = slaps_and_drops() + spray() + gurgle() + swishes()
    ringing = amp(ring_db) * hollow_ring(splashing)
    water = splashing + ringing + gulps() + slurps() + drips() + churn()
    return water + bank(water) + open_air()


def record(dry):
    """Each microphone port colours the sound in its own way; then the treble is cut at the band edge."""
    ratio = amp(read(PORT_BALANCE, bins(dry)))
    # the two gains keep a constant summed power
    ports = np.array([ratio, np.ones_like(ratio)]) * np.sqrt(2 / (1 + ratio ** 2))
    heard = irfft(rfft(dry) * ports, N)
    lowpass = signal.firwin(401, EDGE_HZ, window=("kaiser", 8), fs=SR)
    return signal.oaconvolve(heard, lowpass[None], "same")


dry = scene()
out = record(dry)
transcribe(out)
```